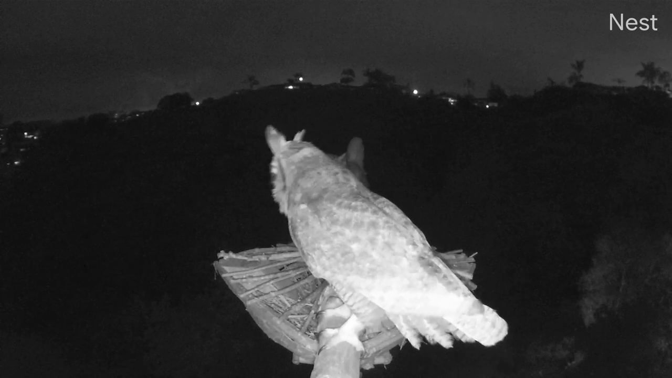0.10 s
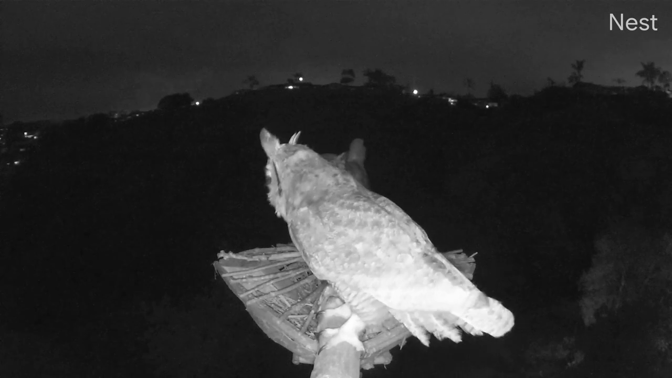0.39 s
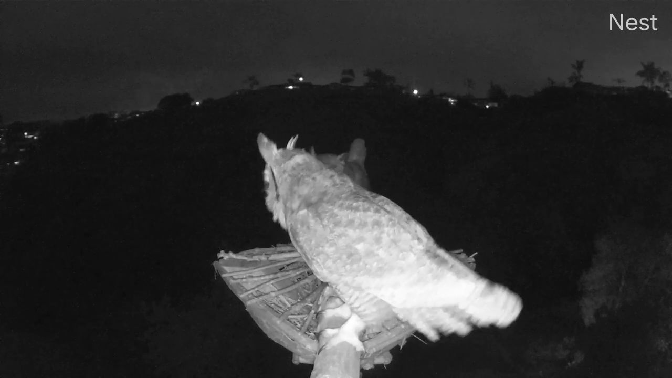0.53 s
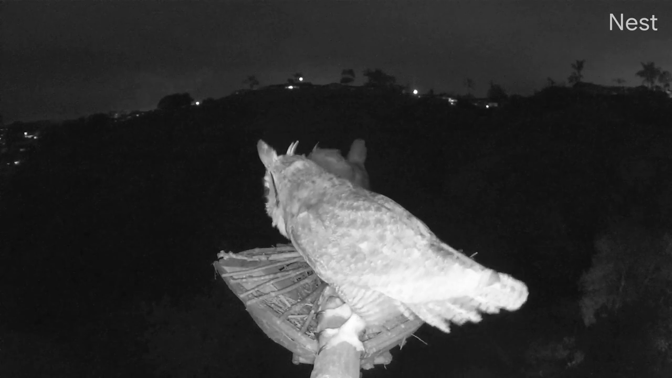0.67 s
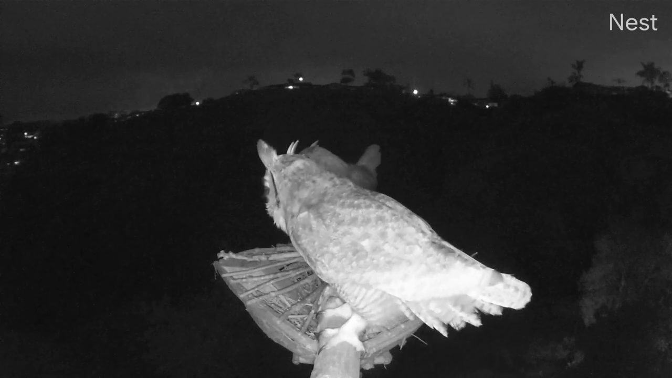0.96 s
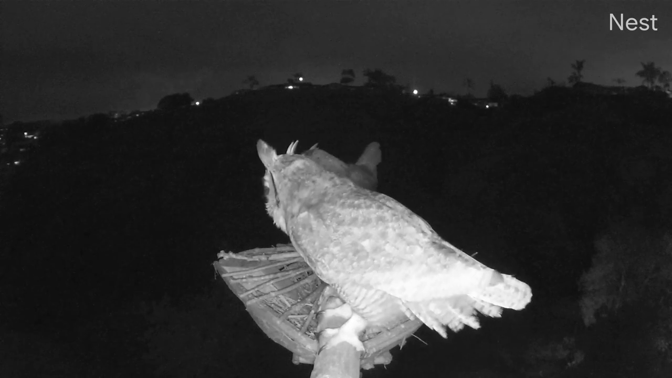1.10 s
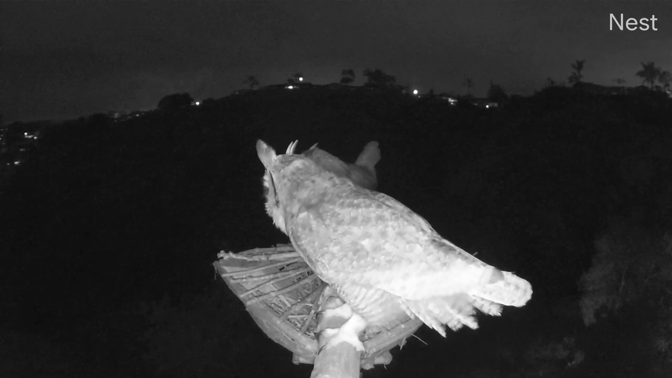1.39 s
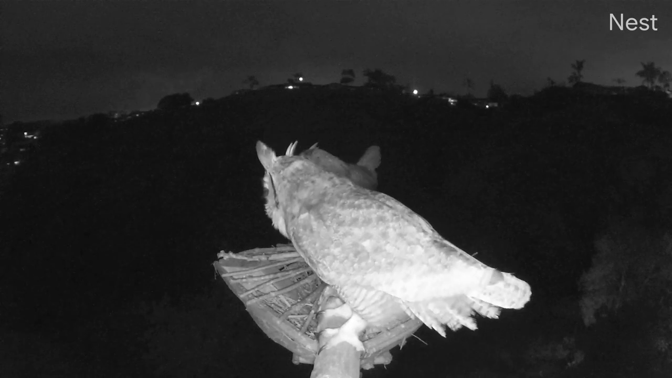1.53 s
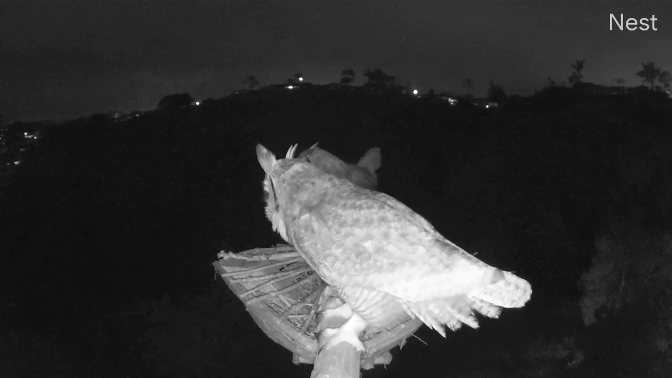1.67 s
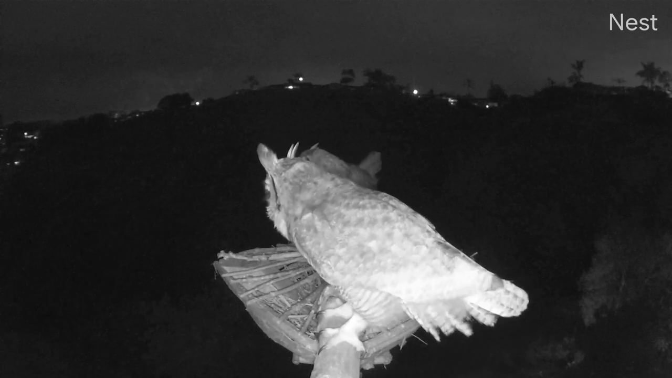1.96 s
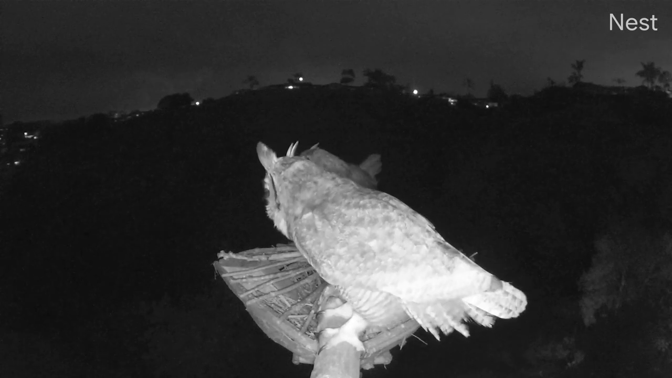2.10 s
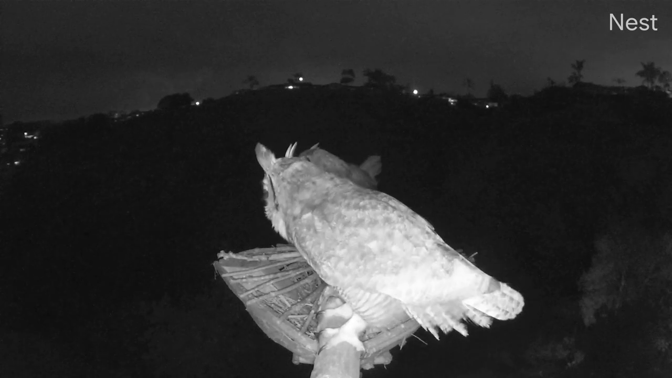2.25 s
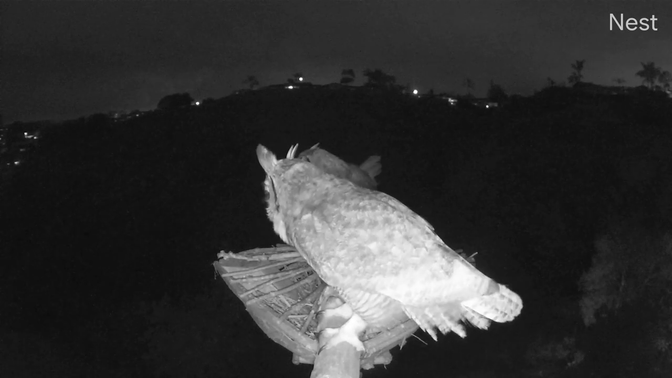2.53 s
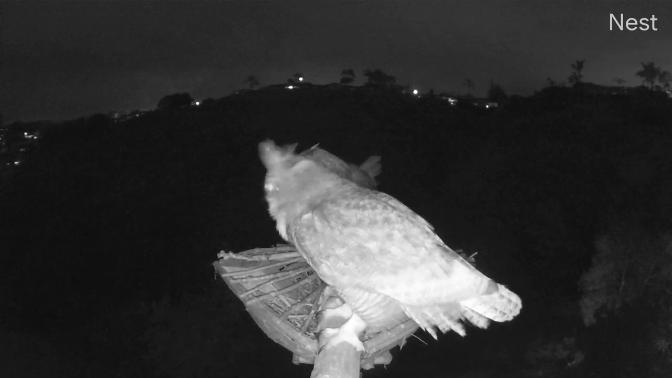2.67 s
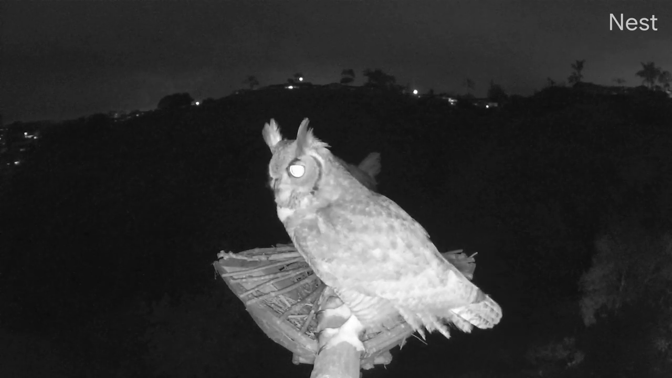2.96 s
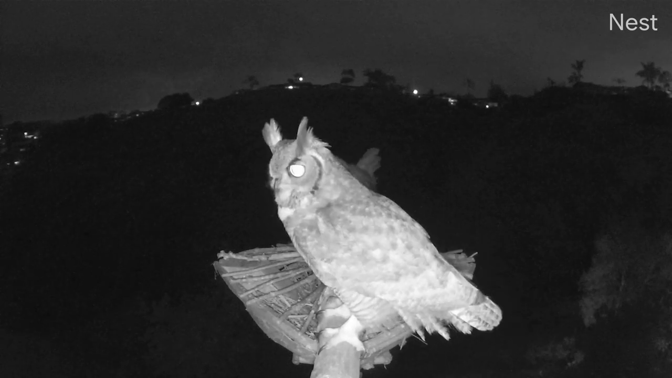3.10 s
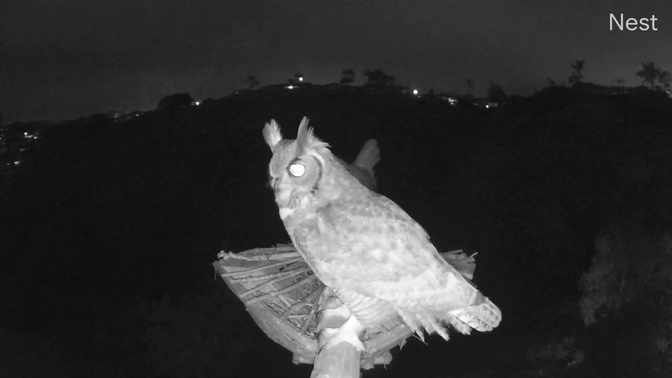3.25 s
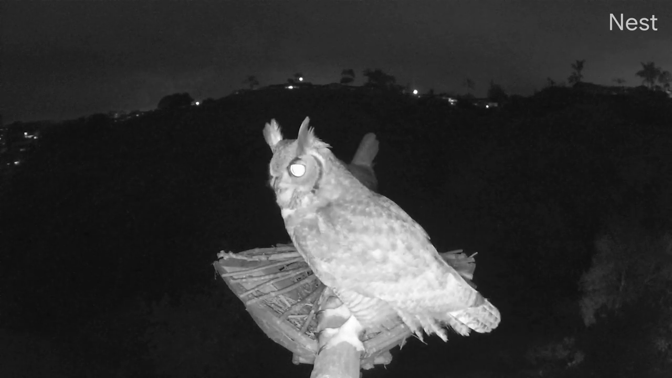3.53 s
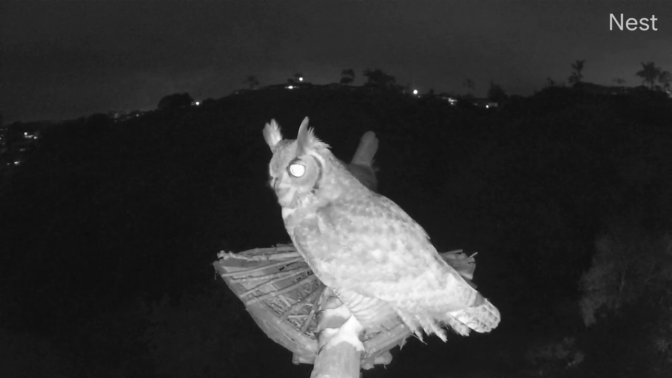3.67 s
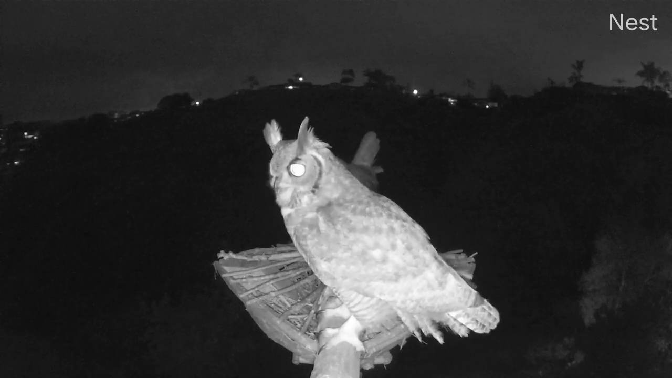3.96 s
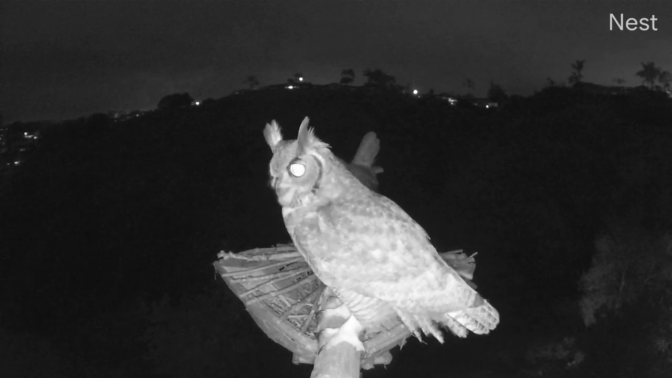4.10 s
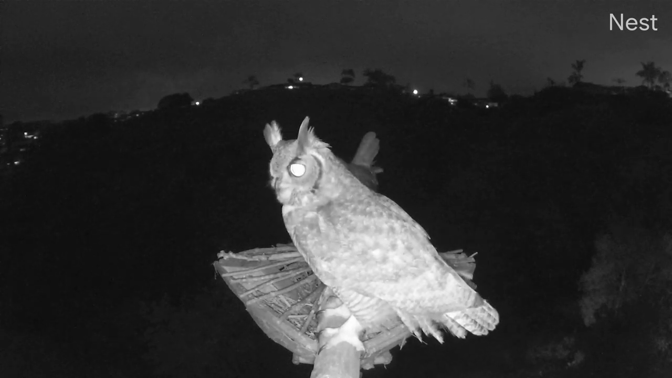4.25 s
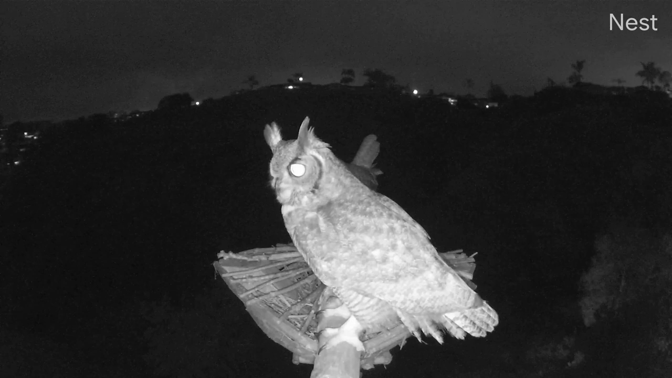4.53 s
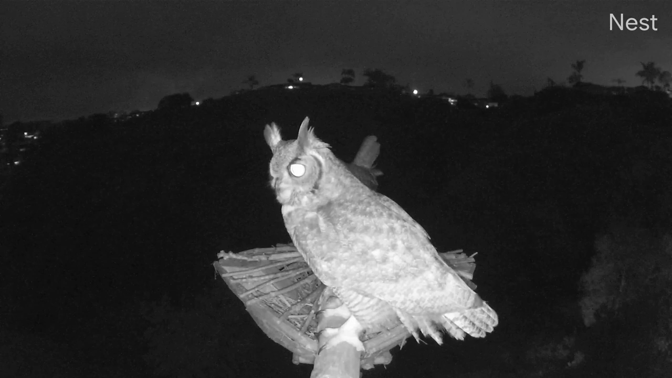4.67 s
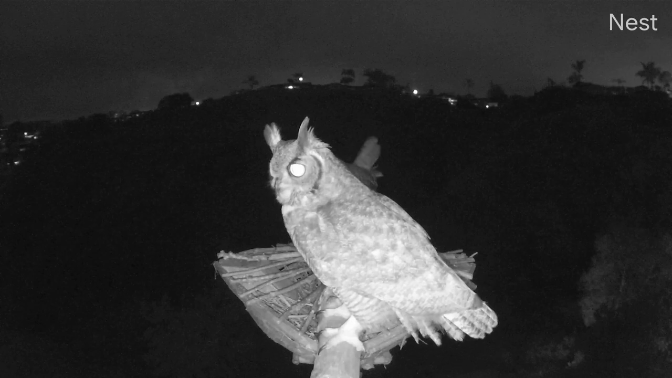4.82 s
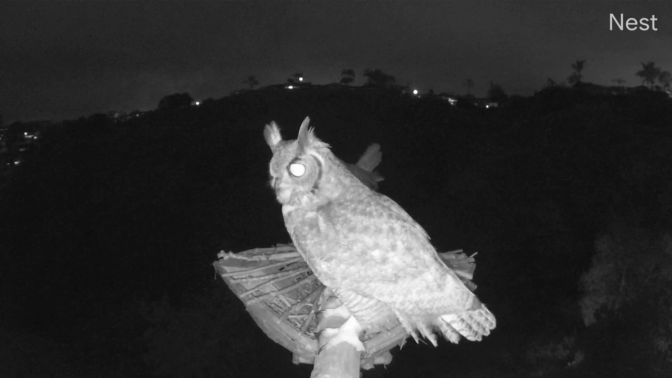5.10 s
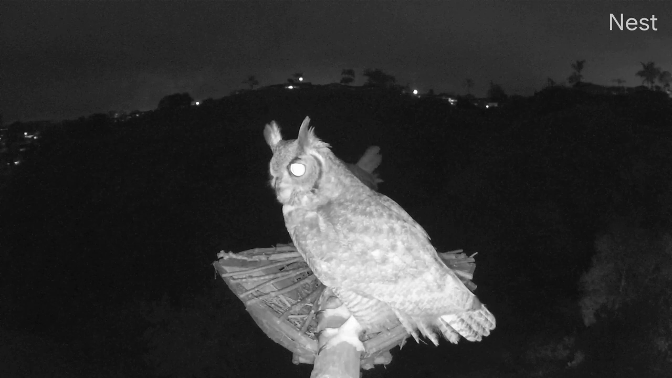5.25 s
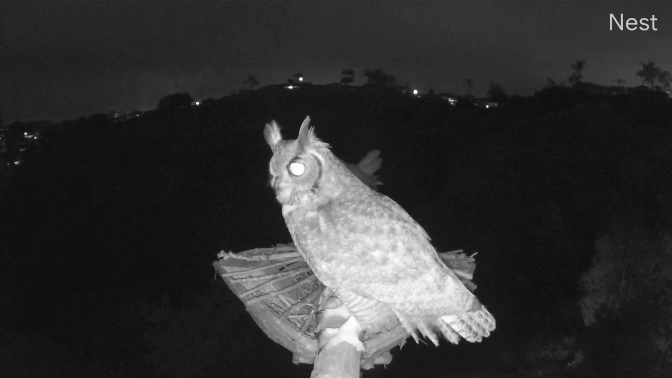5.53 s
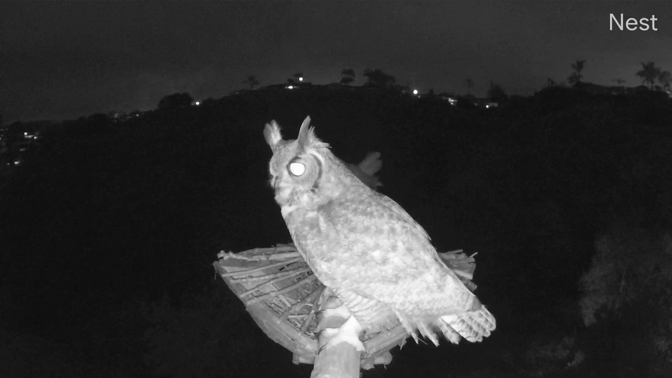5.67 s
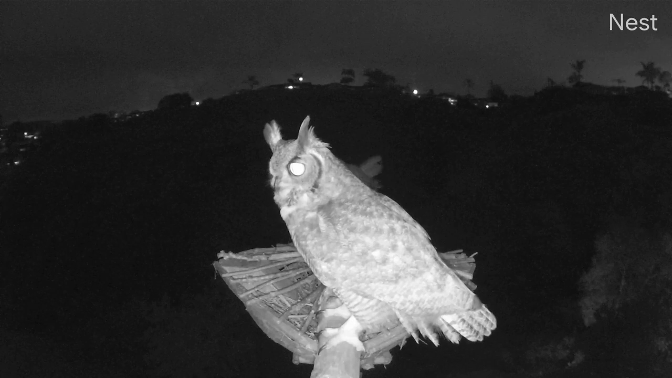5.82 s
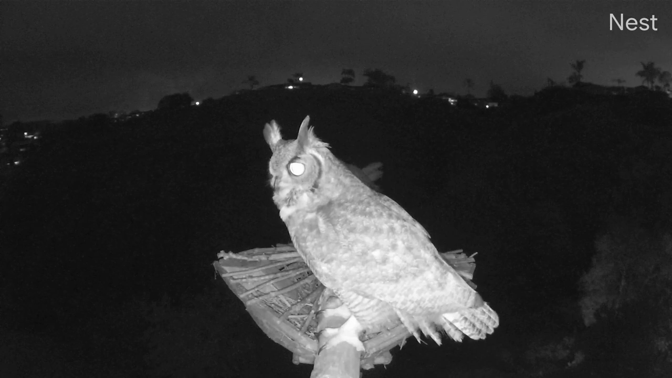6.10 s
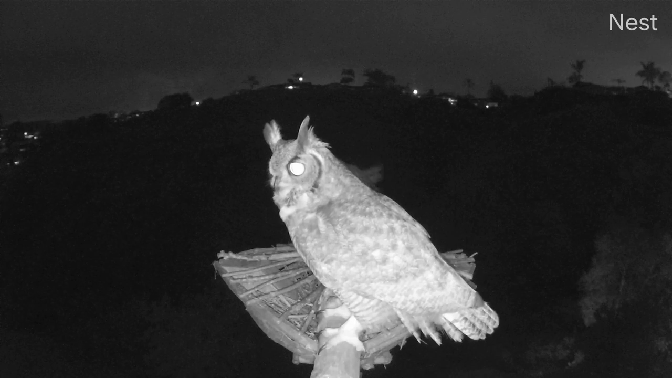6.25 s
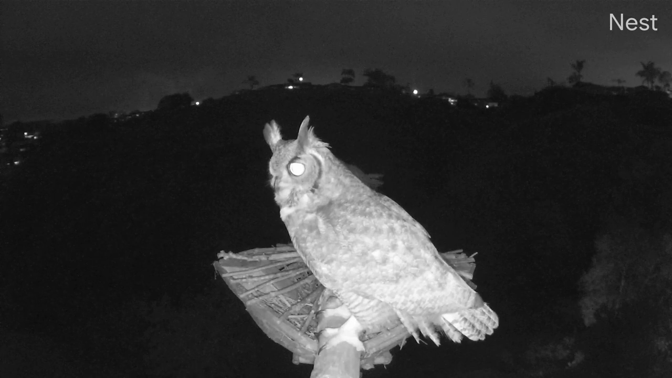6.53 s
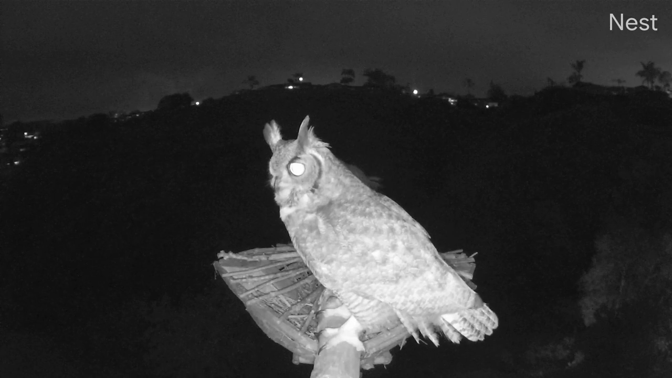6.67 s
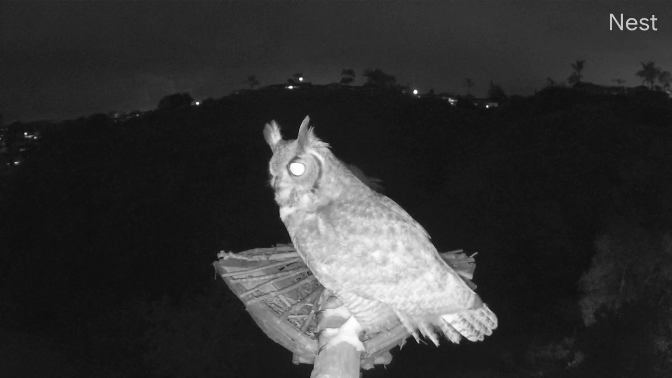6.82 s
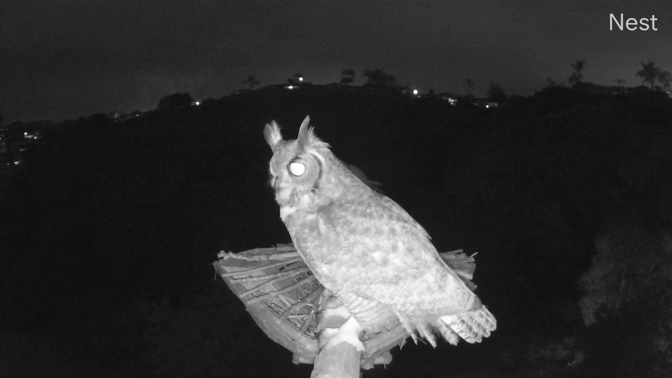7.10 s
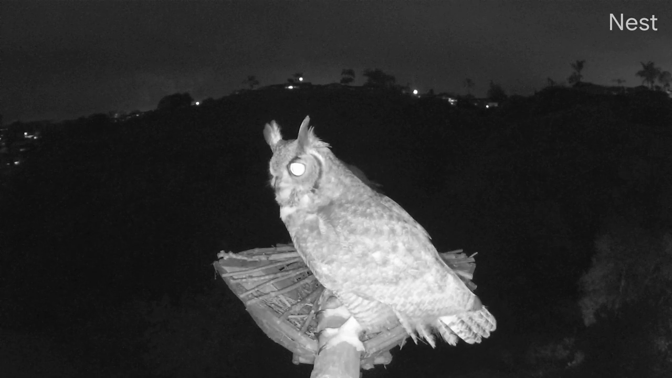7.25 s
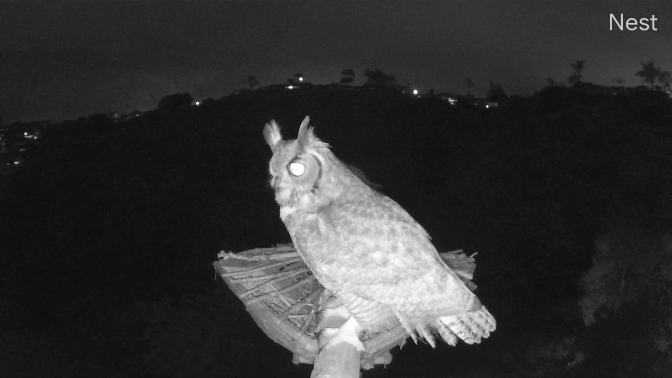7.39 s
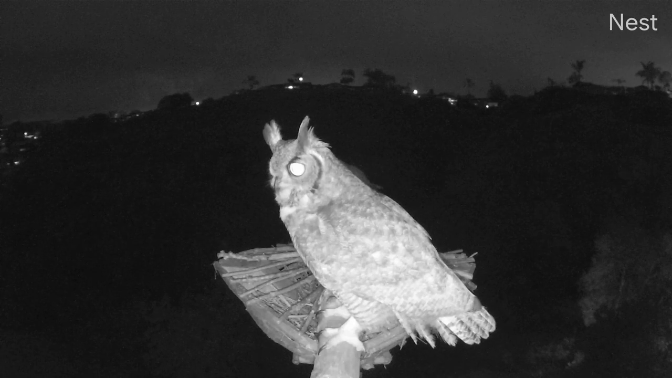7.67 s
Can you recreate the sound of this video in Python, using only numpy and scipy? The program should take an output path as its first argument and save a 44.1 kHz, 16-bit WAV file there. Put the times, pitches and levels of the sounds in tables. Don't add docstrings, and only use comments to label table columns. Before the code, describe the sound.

Two big horned owls hoot close to a small outdoor camera at night. Overlapping opening hoots lead to shorter ones and two falling lower answers; after a brief pause the higher bird gives a quick stuttering run and two long, sagging calls. Then only faint distant road wash and high, tiny cricket chirps remain, grainy and watery from low-quality compression.

```python
import sys
import numpy as np
from scipy import signal
from scipy.fft import irfft, next_fast_len
from scipy.io import wavfile
from scipy.ndimage import uniform_filter1d

SR = 44100
rng = np.random.default_rng(int(sys.argv[2]) if len(sys.argv) > 2 else 0)


def amp(db):
    return 10 ** (np.asarray(db, float) / 20)


def write(x):
    x = np.atleast_2d(x).T
    wavfile.write(sys.argv[1], SR, np.round(np.clip(x, -1, 1) * 32767).astype(np.int16))


N = 341775


def read(points, hz):
    f, value = np.transpose(points)
    return np.interp(np.log(hz + 1), np.log(f + 1), value)


def add(mix, start_s, sound):
    part = mix[round(start_s * SR):][:len(sound)]
    part += sound[:len(part)]


def noise(spectrum_db):
    a, b = rng.standard_normal((2, len(spectrum_db)))
    x = irfft((a + 1j * b) * amp(spectrum_db))[:N]
    return x / x.std()


def slow_noise(hz, corner_hz):
    return noise(-np.minimum(6 * (hz / corner_hz) ** 2, 90))


# [t/s, level/dB]
CARS = [(0, -56.5), (.39, -57), (2.2, -57.5), (2.5, -56), (3.28, -57), (3.75, -52.5), (4.14, -56),
        (4.5, -53), (4.79, -56.5), (5.15, -54), (5.6, -56.5), (7.15, -55), (7.75, -57.5)]
# [f/Hz, level/dB per Hz]
ROAD_SPECTRUM = [(40, -44.5), (120, -28), (200, -19), (330, -6.5), (600, -4.5), (900, 0), (1350, 0.5),
                 (2000, -6), (3000, -15), (5000, -38.5)]
# [f/Hz, level/dB per Hz]
HISS_SPECTRUM = [(1000, -19.5), (2000, -4), (3000, -2.5), (4000, -0.5), (5500, -1), (6600, -3.5),
                 (6850, -7.5), (6950, -14.5), (7500, -10.5), (7700, -59)]
HISS_DB = -59


def night(hz):
    level_db = np.interp(np.arange(N) / SR, *np.transpose(CARS))
    road = amp(level_db + 3.0) * noise(read(ROAD_SPECTRUM, hz))
    hiss = amp(HISS_DB) * noise(read(HISS_SPECTRUM, hz))
    return road + hiss


# [f/Hz, width/Hz, level/dB, throb rate/Hz]
FAR_CRICKETS = [(4790, 400, -67.5, 18), (5500, 280, -71, 15), (4200, 220, -74, 12), (5900, 300, -76, 18)]
# [t/s, peak level/dB, f/Hz]
NEAR_CHIRPS = [(0.313, -52, 4760), (0.8164, -60.5, 4740), (1.3892, -48, 4770), (1.46, -48.5, 4750),
               (1.5424, -49, 4650), (2.2245, -54, 4880), (2.323, -54, 4970), (2.412, -50, 4790),
               (2.807, -49, 4750), (2.9282, -62, 4770), (3.2031, -53, 4860), (3.4425, -46, 4730),
               (3.713, -47, 4810), (3.8282, -55, 4870), (3.9293, -50, 4890), (4.1056, -53, 4760),
               (4.3104, -47.5, 4740), (4.403, -51, 4680), (4.6319, -50, 4710), (5.1113, -51, 4730),
               (6.1804, -58, 4760), (6.3086, -56, 4700), (6.511, -56, 4790), (6.852, -52, 4680),
               (6.9132, -50, 4750), (7.0898, -48.5, 4750), (7.316, -50, 4850), (7.422, -64, 4400),
               (7.477, -50, 4780), (7.7056, -51, 4820)]


def crickets(hz):
    out = np.zeros(N)
    for centre_hz, width_hz, db, rate_hz in FAR_CRICKETS:
        throb_db = 3.4 * slow_noise(hz, rate_hz)
        band_db = -np.minimum(6 * (2 * (hz - centre_hz) / width_hz) ** 2, 60)
        out += amp(db + throb_db) * noise(band_db)
    t = np.arange(0, .024, 1 / SR)
    for start_s, db, pitch_hz in NEAR_CHIRPS:
        stroke = np.hanning(len(t)) * np.sin(2 * np.pi * pitch_hz * t)
        add(out, start_s, amp(db - 2.5) * stroke)
    return out


REST_HZ, BOW_HZ_PER_S2, FALL_S = 185.3, 600, .022


def effort(pushes, t):
    start, length, top, drift, rise = np.transpose(pushes)[:, :, None]
    mid = t - start - length / 2
    onset = np.exp(np.minimum((start - t) / rise, 3))
    release = np.exp(np.minimum((t - start - length) / FALL_S, 3))
    arch = top + drift * mid - BOW_HZ_PER_S2 * mid ** 2
    return (arch - (top - REST_HZ) * (onset + release)).max(0)


KNEE_HZ, WAVER_HZ, WAVER_DB = 24, 1.5, 0.73
VOICED_S = .006


def hoot(pushes, voice, octave_rad, level_db, octave_db, third_db, puff_db, air, waver):
    t = np.arange(pushes[0][0] - VOICED_S, sum(pushes[-1][:2]) + 0.042, 1 / SR)
    first_sample = round(t[0] * SR)
    at = slice(first_sample, first_sample + len(t))
    drive = effort(pushes, t) + WAVER_HZ * waver[0, at]
    effort_hz, first_db, second_db = np.transpose(voice)
    first_db = np.interp(drive, effort_hz, first_db) + level_db + WAVER_DB * waver[1, at]
    second_db = np.interp(drive, effort_hz, second_db) + level_db + octave_db + 2 * WAVER_DB * waver[2, at]
    pitch_hz = REST_HZ + KNEE_HZ * np.logaddexp(0, (drive - REST_HZ) / KNEE_HZ)
    pitch_hz = uniform_filter1d(pitch_hz, size=400)
    first = uniform_filter1d(amp(first_db), size=400)
    octave = uniform_filter1d(amp(second_db), size=400)
    phase = 2 * np.pi * np.cumsum(pitch_hz) / SR
    tone = first * np.cos(phase) + octave * np.cos(2 * phase + octave_rad)
    tone += amp(third_db) * np.sqrt(first * octave) * np.cos(3 * phase)
    puff = amp(puff_db) * np.maximum(first, octave) * air[at]
    return t[0], (puff - np.sqrt(2) * tone) * signal.windows.tukey(len(t), .03)


# [t/s, length/s, top f/Hz, drift/(Hz/s), rise/s]
LOW_AWAY = [
    [(0.061, 0.124, 284.8, -15, .014)],
    [(.342, .298, 303.7, -60, .018)],
]
HIGH_HOOTS = [
    [(0.13, .395, 332.7, -6, .013)],
    [(0.838, 0.29, 335.3, -35, .011)],
    [(1.355, .193, 348.4, -250, 0.031)],
    [(2.852, 0.06, 300.6, -100, 0.02)],
    [(3.006, 0.11, 360, -250, .019)],
    [(3.287, 0.12, 351.2, -330, 0.015), (3.394, .155, 364.4, -16, .022), (3.47, 0.26, 337, -100, 0.016)],
    [(4.308, 0.39, 341.3, -15.5, .011)],
    [(5.001, 0.27, 338.4, -74, .010)],
]
LOW_HOOTS = [
    [(1.398, .357, 284.6, -83.5, .013)],
    [(2.14, .292, 291.4, -125, .013)],
]
# [effort f/Hz, fundamental level/dB, octave level/dB]
HIGH_LEVELS = [(-100, -91.5, -69.5), (109, -77.5, -52.5), (207.5, -57.5, -43.5), (255, -50, -41.5),
               (290.5, -41, -42), (324, -33.5, -39), (352.5, -28.5, -38)]
LOW_LEVELS = [(-100, -94.5, -78.5), (110, -80, -58), (197.5, -60, -45), (263, -43.5, -47.5),
              (282, -36.5, -44), (311, -31, -44.5)]
# [f/Hz, level/dB per Hz]
PUFF_SPECTRUM = [(20, -10.5), (60, -14.5), (150, -8.5), (230, 4), (450, -6), (750, -5), (1100, -22.5),
                 (2000, -63)]
WAVER_S = 0.027


def owls(hz):
    out = np.zeros(N)
    air = noise(read(PUFF_SPECTRUM, hz))
    waver = np.array([slow_noise(hz, 1 / WAVER_S) for _ in range(3)])
    for pushes in LOW_AWAY:
        add(out, *hoot(pushes, LOW_LEVELS, octave_rad=1.4, level_db=-2.5, octave_db=-4.5,
                       third_db=-26, puff_db=-18, air=air, waver=waver))
    for pushes in HIGH_HOOTS:
        add(out, *hoot(pushes, HIGH_LEVELS, octave_rad=0.24, level_db=0.082, octave_db=0.053,
                       third_db=-20.5, puff_db=-16.5, air=air, waver=waver))
    for pushes in LOW_HOOTS:
        add(out, *hoot(pushes, LOW_LEVELS, octave_rad=1.7, level_db=0.15, octave_db=0.076,
                       third_db=-30.5, puff_db=-18, air=air, waver=waver))
    return out


def scene():
    hz = np.fft.rfftfreq(2 * next_fast_len(N // 2 + 1), 1 / SR)
    return (night(hz) + crickets(hz) + owls(hz))[None]


# [f/Hz, level/dB]
STEP_OVER_LOCAL = [(100, 10), (300, 9), (700, 10), (1200, 13), (2500, 15), (4500, 15.5), (6800, 15.5),
                   (7200, 14)]
BAND_STARTS = np.r_[0:88:8, 88:196:12, 196:260:16, np.geomspace(260, 832, 17).round().astype(int), 896, 960]
SIZE, LEAD = 1024, 233


def camera_sound(x, least_db, most_db, unrest_db, top_share):
    slow = signal.resample_poly(np.pad(x, (441 - LEAD, 9000)), 160, 441)
    slow = np.pad(slow, (2 * SIZE - 160, 0)).astype(np.float32)
    n, k = np.arange(2 * SIZE)[:, None], np.arange(SIZE) + .5
    window = np.sin(np.pi * (n + .5) / (2 * SIZE))
    basis = window * np.cos(np.pi / SIZE * (n + .5 + SIZE / 2) * k)
    basis = basis.astype(np.float32)
    lines = np.lib.stride_tricks.sliding_window_view(slow, 2 * SIZE)[::SIZE].copy() @ basis

    band = np.searchsorted(BAND_STARTS, np.arange(SIZE), "right") - 1
    width = np.bincount(band)
    local_db = uniform_filter1d(20 * np.log10(abs(lines) + 1e-6), size=56, axis=1, mode="nearest")
    band_db = np.add.reduceat(local_db, BAND_STARTS, axis=1) / width
    power_db = 10 * np.log10(np.add.reduceat(lines ** 2, BAND_STARTS, axis=1) / width + 1e-12)
    band_db = np.maximum(band_db, power_db - 6)
    step_db = np.maximum(band_db + read(STEP_OVER_LOCAL, BAND_STARTS * 8000 / SIZE), least_db)
    step_db = np.minimum(step_db, np.median(step_db, axis=0) + most_db)
    step = amp(step_db + unrest_db * rng.standard_normal(step_db.shape))[:, band]
    kept = np.sign(lines) * step * np.floor((abs(lines) / step) ** .75 + .4054) ** (4 / 3)

    peak_db = power_db.max(1, keepdims=True)
    loud = peak_db > np.median(peak_db) + 12
    kept[:, BAND_STARTS[-2]:] *= rng.random((len(kept), 1)) < top_share * (1 - .8 * loud)

    halves = (kept @ basis.T * 2 / SIZE).reshape(-1, 2, SIZE)
    slow = (halves[1:, 0] + halves[:-1, 1]).ravel()[SIZE - 160:]
    lowpass = signal.firwin(14001, 8050, fs=160 * SR, window=("kaiser", 7))
    return signal.resample_poly(slow, 441, 160, window=lowpass)[441 - LEAD:][:N]


def top_cut(x):
    return signal.sosfilt(signal.butter(12, 8790, fs=SR, output="sos"), x)


def record(dry):
    heard = camera_sound(dry[0], least_db=-30, most_db=7, unrest_db=2.4, top_share=.58)
    return top_cut(heard[None])


dry = scene()
out = record(dry)
write(out)
```